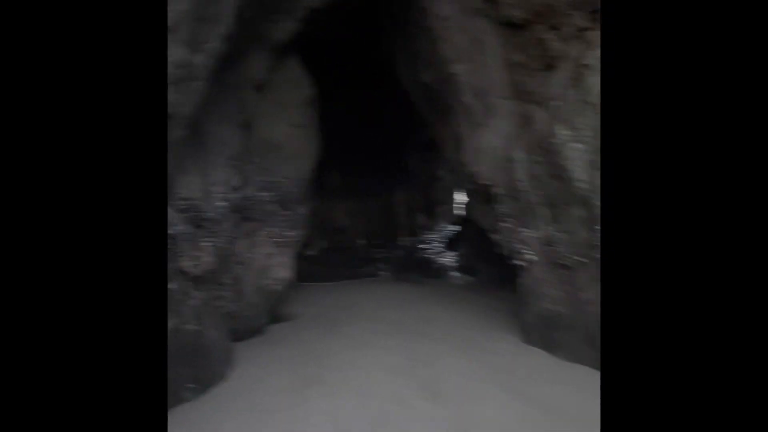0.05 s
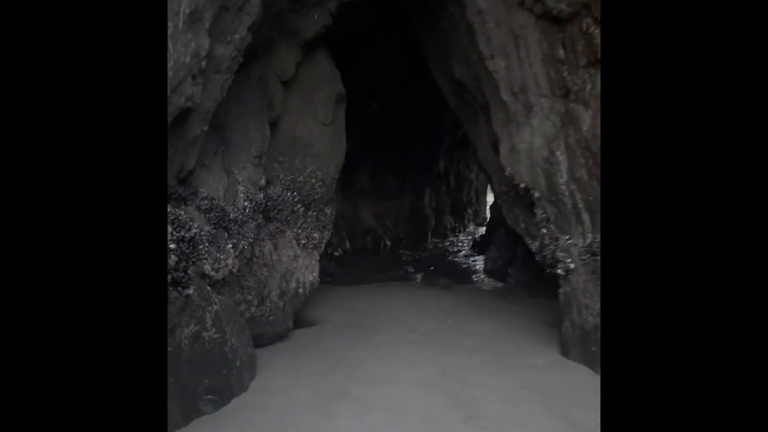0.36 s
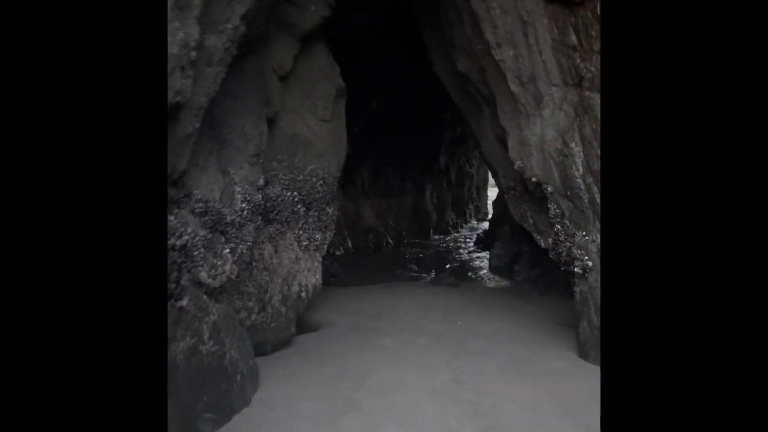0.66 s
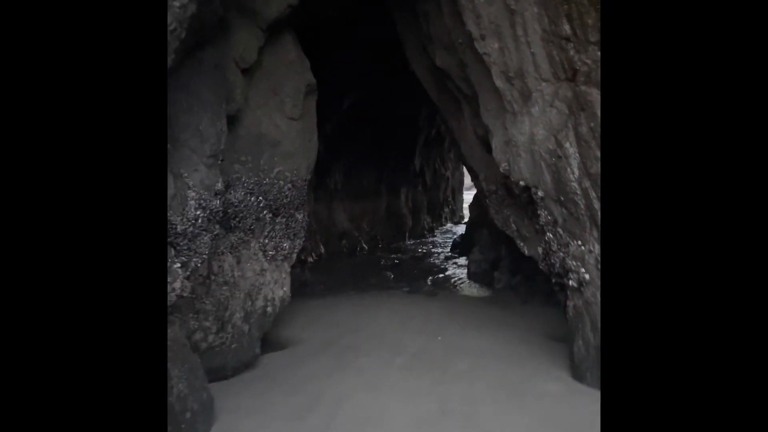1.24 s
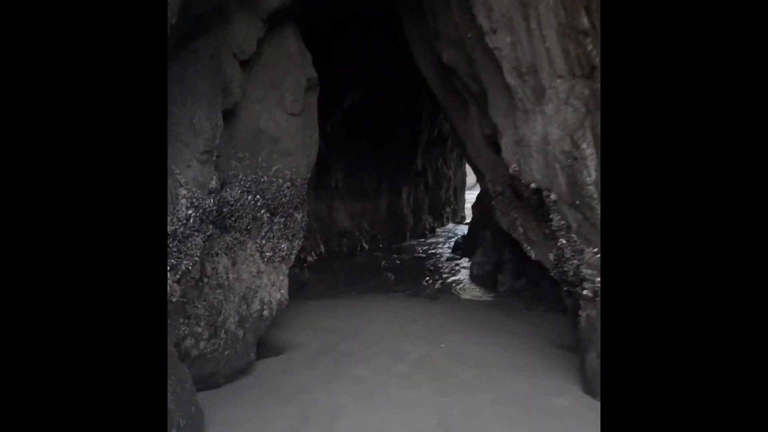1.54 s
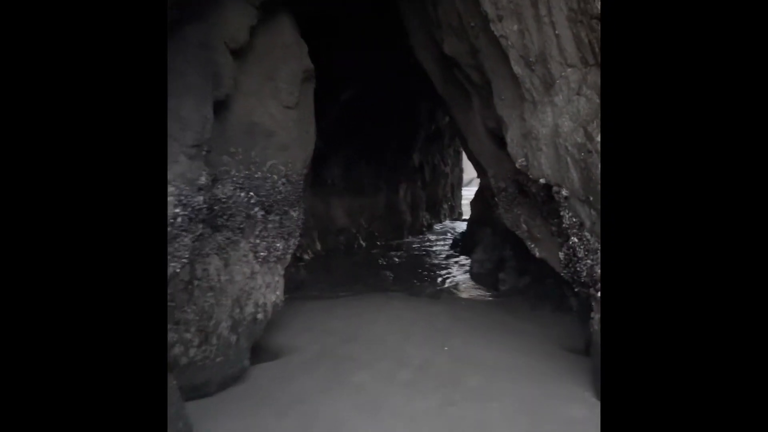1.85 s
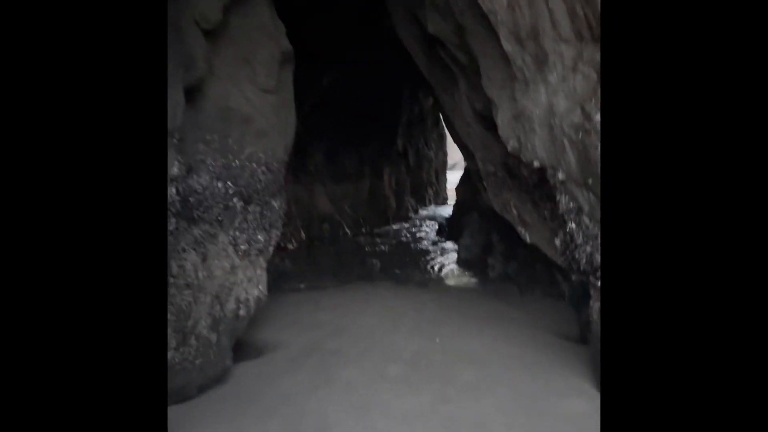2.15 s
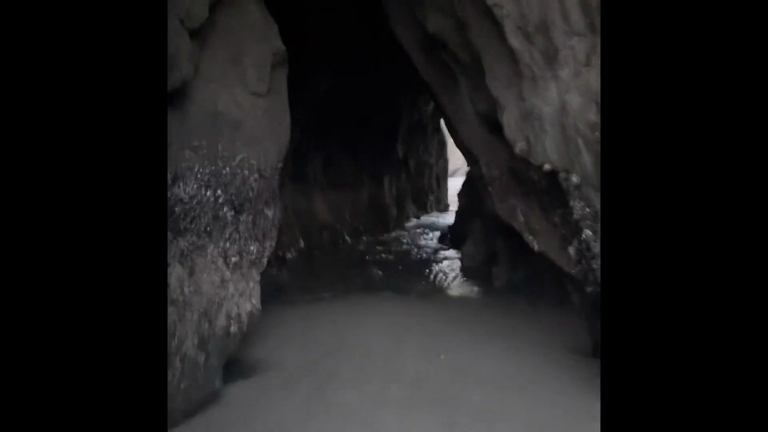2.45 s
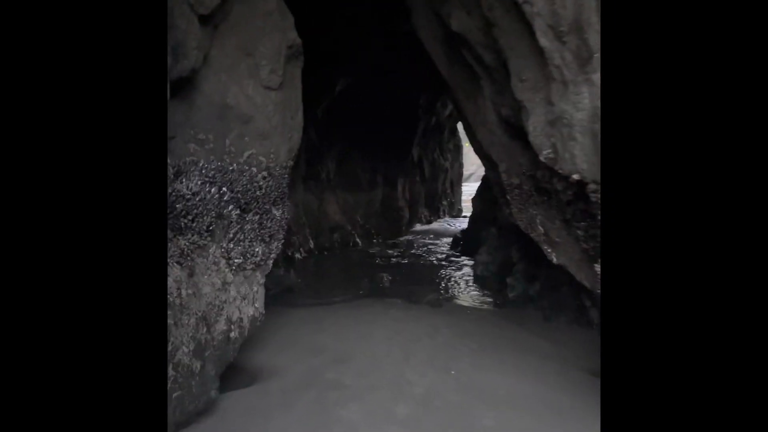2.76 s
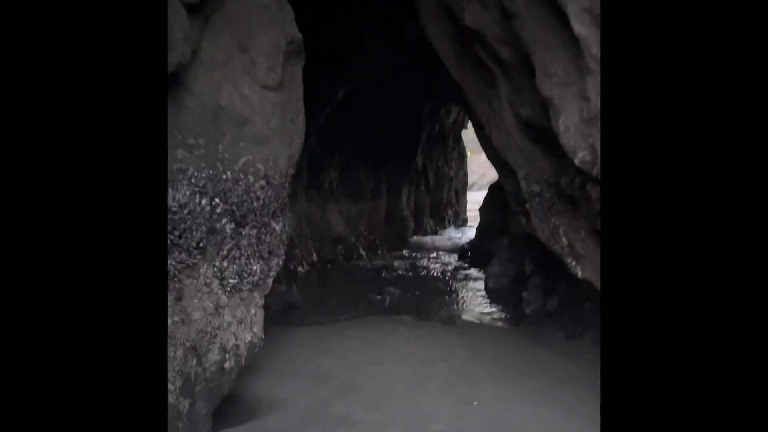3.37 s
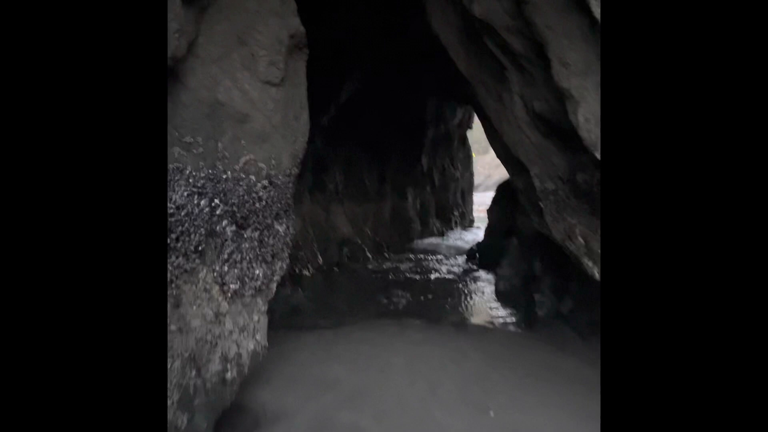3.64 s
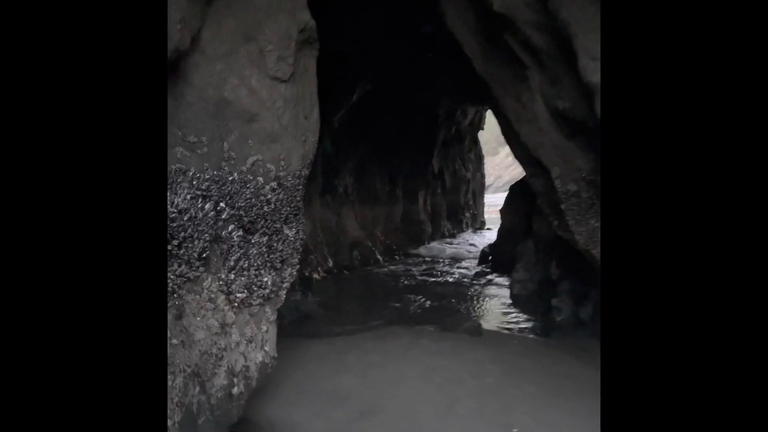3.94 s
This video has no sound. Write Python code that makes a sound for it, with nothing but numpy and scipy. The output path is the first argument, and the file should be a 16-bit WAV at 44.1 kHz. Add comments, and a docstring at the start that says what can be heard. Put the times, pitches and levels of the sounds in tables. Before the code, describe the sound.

Continuous surf echoes inside a rocky sea cave, its low rumble, wash and fizzing foam swelling as the opening comes closer. Soft bumps shake the handheld microphone early and past the middle, and water gurgles briefly near the end.

```python
"""Surf rushes through a sea cave, louder and brighter as the opening comes nearer.
The rock smears the breakers into bands of noise: a rumble, a hollow boom, a wash, a hiss of foam.
Small bubbles ring and one air pocket gurgles; both echo off the walls.
A few soft low bumps shake the carried microphone, whose left port hears the sea first."""
import sys
import numpy as np
from scipy import signal
from scipy.fft import rfft, irfft, next_fast_len
from scipy.io import wavfile
from scipy.ndimage import map_coordinates

SR = 44100
rng = np.random.default_rng(int(sys.argv[2]) if len(sys.argv) > 2 else 0)


def generate_wav(signal):
    """Clip the signal to [-1, 1] and save it as 16-bit WAV at the path in sys.argv[1]."""
    frames = np.transpose(np.atleast_2d(signal))
    scaled = np.clip(frames, -1, 1) * 32767
    pcm = np.round(scaled).astype(np.int16)
    wavfile.write(sys.argv[1], SR, pcm)


N = 176400

RUMBLE_FROM_HZ, BOOM_FROM_HZ, WASH_FROM_HZ, FOAM_FROM_HZ, TOP_HZ = 67, 124.6, 402, 2830, 12600
# breakers' wash: time_s, level_db
WASH_LEVEL = [(0, -42), (0.55, -42), (0.9, -39.0), (1.35, -37.5), (1.9, -35.5), (2.25, -35), (2.6, -33.5),
              (2.92, -31), (3.25, -31), (3.45, -31.5), (3.75, -29.5), (4, -28.5)]


def amp(db):
    """Decibels to gain."""
    return 10 ** (np.asarray(db) / 20)


def unit(x):
    """x at rms 1."""
    return x / np.sqrt(np.mean(x ** 2) + 1e-20)


def along(points, hz):
    """(freq_hz, value) points, read on a log frequency axis."""
    freq_hz, value = np.transpose(points)
    return np.interp(np.log(hz + 1), np.log(freq_hz + 1), value)


def curve(points):
    """(time_s, value) points joined to one value per sample."""
    return np.interp(np.arange(N) / SR, *np.transpose(points))


def wobble(knots_per_s):
    """Smooth random curve."""
    return map_coordinates(rng.standard_normal(1024), [np.arange(N) * knots_per_s / SR], mode="wrap")


def filtered(x, response):
    """x through the complex frequency response(hz)."""
    size = next_fast_len(N + SR // 2)
    return irfft(rfft(x, size) * response(np.fft.rfftfreq(size, 1 / SR)), size)[..., :N]


def to_stereo(pair):
    """Two unrelated signals to left and right: partly alike, the left ahead in phase."""
    # how alike left and right sound at each frequency: freq_hz, coherence
    alike = [(80, 0.89), (230, 1), (650, 0.86), (1200, 0.84), (1800, 1), (2700, 0.82), (4700, 0.73),
             (6000, 0.92), (7500, 0.83), (9000, 1), (10900, 0.79), (11900, 0.9)]
    # left ahead of right: freq_hz, phase_rad
    lead = [(1900, 0), (2600, .75), (4000, .85), (4500, 1.6), (4900, 3.2), (5300, 5), (5800, 6.2),
            (6200, 6.4), (8000, 8.5), (9900, 10.1), (11200, 11.3), (11800, 12.5)]
    # left over right: freq_hz, gain_db
    balance = [(330, 0), (650, 0.9), (1150, 1), (2100, -0.5), (3700, -0.1), (6500, -0.5)]
    mix_rad = lambda hz: np.arccos(np.clip(along(alike, hz), 0, .99)) / 2
    mid, side = filtered(pair, lambda hz: np.array([np.cos(mix_rad(hz)), np.sin(mix_rad(hz))]))
    split = lambda points, hz: np.outer([.5, -.5], along(points, hz))
    placement = lambda hz: np.exp(1j * split(lead, hz)) * amp(split(balance, hz))
    return filtered(np.array([mid + side, mid - side]), placement)


def rush(low_hz, high_hz, patchy_db):
    """One stereo band of surf noise, rms 1, with patches of random gain in time and frequency."""
    # surf spectrum through the cave: freq_hz, relative_density_db
    spectrum = [(20, -20), (35, -8), (55, -2), (110, -1.6), (220, -1.6), (310, -3.6), (480, -7.0),
                (780, -8), (1200, -12.5), (2200, -16), (3400, -22), (5000, -25.5), (7000, -26),
                (9500, -27.5), (10600, -22), (11500, -30.5), (12400, -47)]
    noise = signal.stft(rng.standard_normal((2, N)), nperseg=1024)[2]
    patch = np.outer(np.hanning(13), np.hanning(17))
    patches = unit(signal.fftconvolve(rng.standard_normal(noise.shape[1:]), patch, "same"))
    pair = signal.istft(noise * amp(patchy_db * patches), nperseg=1024)[1][:, :N]
    below = lambda hz, edge_hz: 1 / (1 + (hz / edge_hz) ** 8)
    band = lambda hz: amp(along(spectrum, hz)) * np.sqrt(below(hz, high_hz) * (1 - below(hz, low_hz)))
    return unit(to_stereo(filtered(pair, band)))


def cave(x, t60_s=0.95):
    """Two unrelated echoes of x from the rock walls."""
    t = np.arange(SR) / SR
    tail = rng.standard_normal((2, SR)) * amp(-60 * t / t60_s)
    return signal.fftconvolve(x[None], tail / np.linalg.norm(tail[0]), axes=1)[:, :N]


def bumps(rise_s=0.009, sag_per_s=6.4, puff_hz=110, puff_octaves=0.45, trim_db=-0.5):
    """Microphone bumps: a cycle or two of a low swing that sags in pitch, with a dull puff."""
    # bumps before trim: peak_s, swing_db, pitch_hz, fall_s, puff_db
    knocks = [(0.048, -30, 77.4, 0.0097, -28.5), (0.231, -20, 57, 0.011, -48),
              (0.608, -17.5, 92, 0.0081, -33), (0.627, -18, 57, 0.019, -32), (2.363, -28, 85, 0.014, -45),
              (2.482, -17.5, 88.6, 0.012, -30), (2.575, -17, 65, 0.016, -34), (2.654, -23, 68, 0.03, -35)]
    puff_band = lambda hz: np.exp(-(np.log2((hz + 1) / puff_hz) / puff_octaves) ** 2 / 2)
    puff = unit(filtered(rng.standard_normal(N), puff_band))
    out = np.zeros(N)
    for peak_s, swing_db, pitch_hz, fall_s, puff_db in knocks:
        t = np.arange(N) / SR - peak_s
        swell = np.exp(-(t / np.where(t < 0, rise_s, fall_s)) ** 2)
        cycles = pitch_hz * t * (1 - sag_per_s * t / 2)
        out += swell * (amp(swing_db) * np.cos(2 * np.pi * cycles) + amp(puff_db) * puff)
    return amp(trim_db) * out


def gurgle(peak_s=3.245, half_length_s=0.036, pitch_hz=570, rise_hz_per_s=620, jitter_hz=24):
    """A pocket of air trapped by the water rings unsteadily, rising in pitch as it closes."""
    t = np.arange(N) / SR - peak_s
    hz = pitch_hz + rise_hz_per_s * t + jitter_hz * wobble(90)
    swell = amp(-31.5 + 2.4 * wobble(70)) * np.exp(-(t / half_length_s) ** 2)
    ring = swell * np.sin(2 * np.pi * np.cumsum(hz) / SR)
    return ring + amp(-16) * cave(ring)


def bubbles(rate_per_s=500, median_hz=2620, spread=.7, decay_cycles=7.1, over_wash_db=-16):
    """Small bubbles ring briefly, the larger ones lower and louder, and echo in the cave."""
    draws = np.clip(rng.random((int(rate_per_s * N / SR), 4)), 1e-3, 1 - 1e-3)
    start_draw, pitch_draw, strength_draw, _ = draws.T[:, :, None]
    hz = np.clip(median_hz * (pitch_draw / (1 - pitch_draw)) ** (spread / 2), 400, TOP_HZ)
    strength = -np.log(strength_draw) * np.sqrt(median_hz / hz)
    age_samples = np.arange(SR // 50)
    cycles = hz * age_samples / SR
    rings = strength * np.sin(2 * np.pi * cycles) * np.exp(-cycles / decay_cycles)
    positions = (start_draw * N).astype(int) + age_samples
    pops = np.bincount(positions.ravel(), rings.ravel(), N)[:N]
    in_cave = np.outer([1, 0], pops) + amp(-1) * cave(pops)  # direct sound in the mid only
    return amp(curve(WASH_LEVEL) + over_wash_db) * unit(to_stereo(in_cave))


def foam():
    """Foam hisses over the shallows."""
    # hiss: time_s, level_db
    foam_level = [(0, -51), (0.25, -50.5), (0.5, -48), (0.8, -47.5), (1.05, -47.0), (1.3, -45), (1.55, -45),
                  (1.75, -43.5), (2.15, -43.5), (2.4, -41), (2.7, -41), (2.98, -37.5), (3.2, -38.5),
                  (3.5, -39), (3.8, -36), (4, -35.5)]
    return amp(curve(foam_level) + 0.32 * wobble(13)) * rush(FOAM_FROM_HZ, TOP_HZ, patchy_db=0.88)


def boom(rumble_trim_db=-1.86, sub_db=-44):
    """The cave's hollow roar, the rumble under it, and a near-steady deepest bass from handling the microphone."""
    # hollow roar: time_s, level_db
    roar_level = [(0, -39.5), (0.45, -40.5), (0.95, -38), (1.35, -36.5), (1.6, -39), (2.0, -36.5),
                  (2.2, -33.5), (2.33, -35.5), (2.5, -33), (2.9, -30), (3.09, -34.5), (3.3, -29.5),
                  (3.6, -29.5), (4, -31)]
    # rumble before trim: time_s, level_db
    rumble_level = [(0, -46), (0.3, -43), (0.48, -55), (0.8, -41), (1.3, -37), (1.7, -40.5), (2.1, -38.5),
                    (2.7, -39), (3.1, -32.5), (3.6, -37), (4, -36.5)]
    roar_db = curve(roar_level) + 0.43 * wobble(7.32)
    roar = amp(roar_db) * rush(BOOM_FROM_HZ, WASH_FROM_HZ, patchy_db=0.53)
    rumble_db = curve(rumble_level) + rumble_trim_db + 0.28 * wobble(7.2)
    rumble = amp(rumble_db) * rush(RUMBLE_FROM_HZ, BOOM_FROM_HZ, patchy_db=1.0)
    sub = amp(sub_db + 0.33 * wobble(4.8)) * rush(22, RUMBLE_FROM_HZ, patchy_db=0.8)
    return roar + rumble + sub


def wash():
    """Breaking water tumbles in through the opening."""
    level_db = curve(WASH_LEVEL) + 0.28 * wobble(7.99)
    return amp(level_db) * rush(WASH_FROM_HZ, FOAM_FROM_HZ, patchy_db=1.05)


def scene():
    """Surf in the cave, bumps on the microphone."""
    return boom() + wash() + foam() + bubbles() + bumps() + gurgle()


def record(dry, low_cut_hz=40):
    """The recorder sheds the deepest bass and keeps nothing above its band limit."""
    return filtered(dry, lambda hz: (hz < TOP_HZ) * (1 - np.exp(-(hz / low_cut_hz) ** 2)))


dry = scene()
out = record(dry)
generate_wav(out)
```